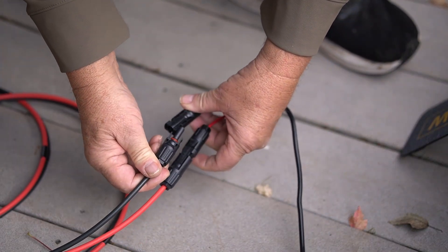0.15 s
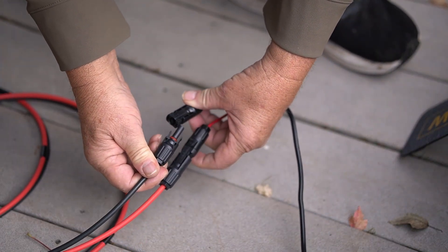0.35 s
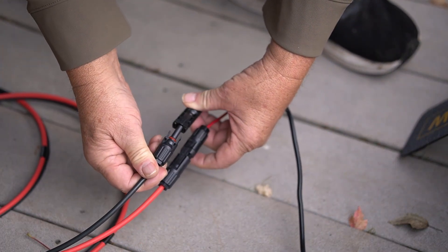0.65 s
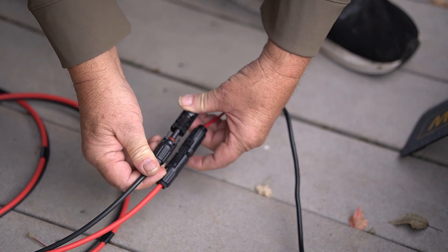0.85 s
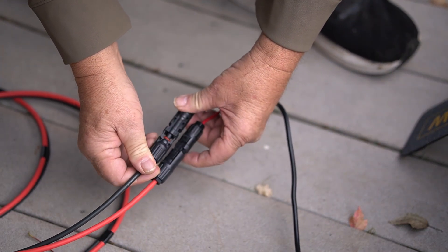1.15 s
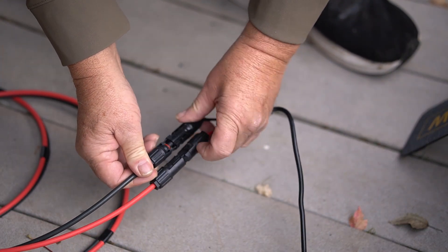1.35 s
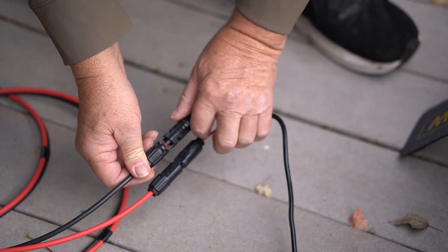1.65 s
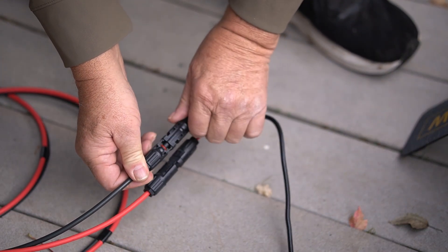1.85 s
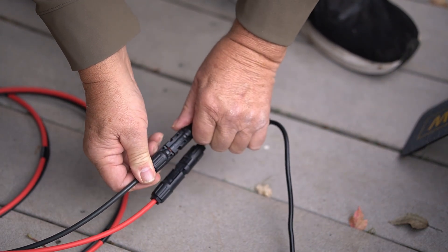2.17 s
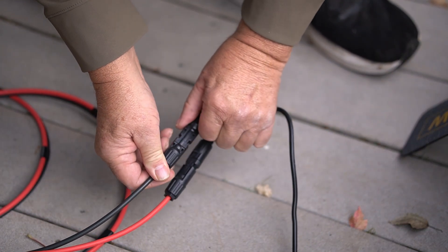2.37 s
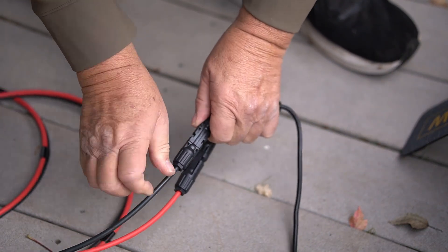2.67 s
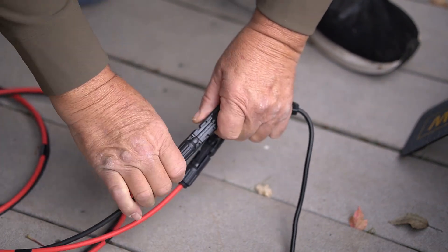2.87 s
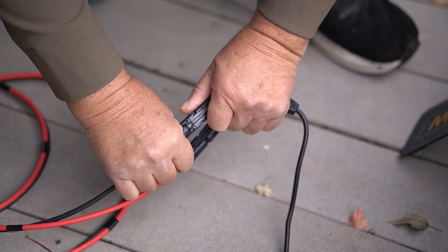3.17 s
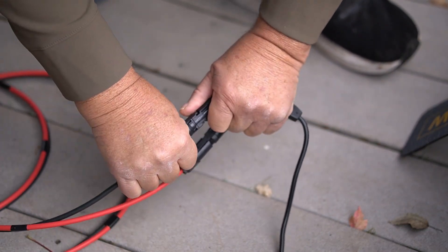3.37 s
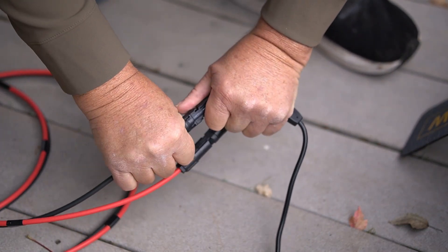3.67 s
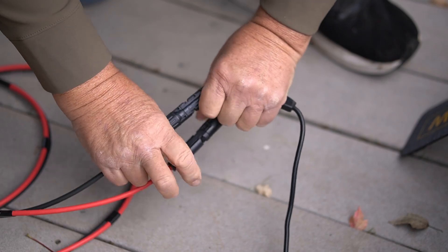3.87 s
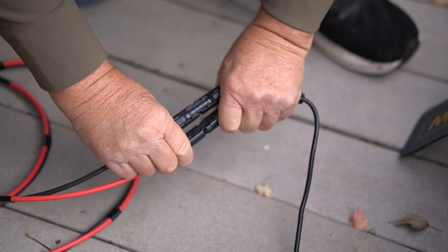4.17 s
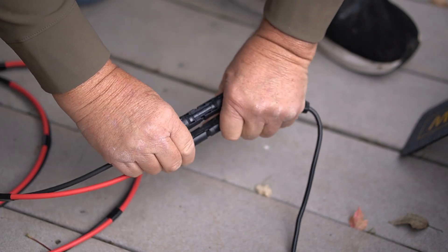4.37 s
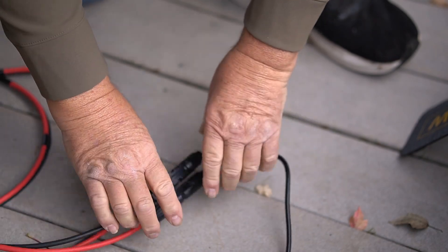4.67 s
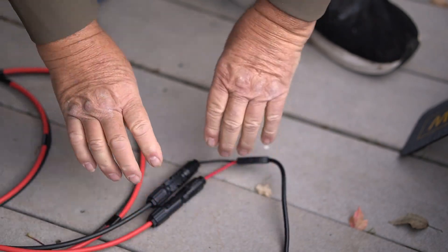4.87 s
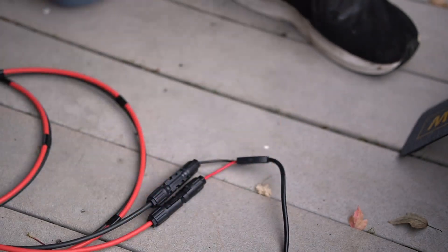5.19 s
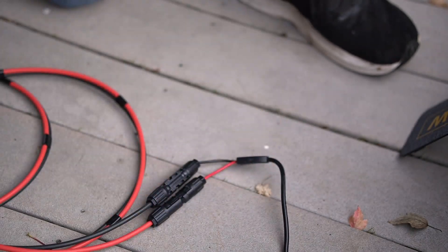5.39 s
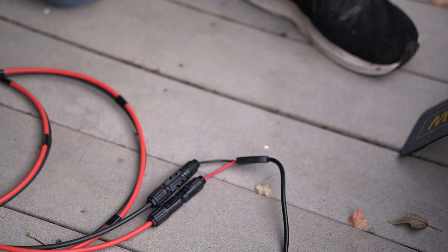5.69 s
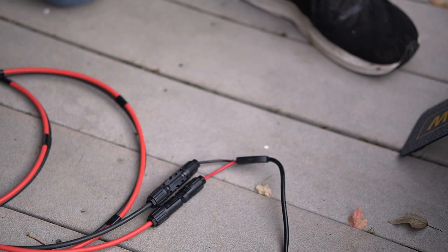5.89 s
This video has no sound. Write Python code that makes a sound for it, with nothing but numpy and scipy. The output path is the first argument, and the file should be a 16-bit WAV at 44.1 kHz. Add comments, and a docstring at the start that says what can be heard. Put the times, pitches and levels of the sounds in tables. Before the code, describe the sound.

A low unsteady rumble and soft steady hiss lie beneath small plastic clicks, first isolated, then clustered, with dry finger scratches and dull handling bumps. Close to the microphone, the joined pieces knock and land on deck boards, a woody clack with plastic rattle. Afterward comes a broad jacket rustle, a soft sole drag, muted footfall thuds and a couple of last ticks.

```python
"""Over a wavering low outdoor rumble, a faint hiss and rubbing sleeves, someone crouching on a board deck plugs
two plastic cable connectors together: struck shell modes tick, latches snap, and bursts of grains scratch.
The pair then touches the boards and drops on them with a short clatter, as decaying board and casing modes.
Last, the person rises and shifts a foot: shaped noise swishes the jacket and drags the sole, low modes thud
through the deck, and a few more plastic ticks sound."""
import sys
import numpy as np
from scipy import signal
from scipy.fft import rfft, irfft
from scipy.io import wavfile
from scipy.ndimage import map_coordinates

SR = 44100
rng = np.random.default_rng(int(sys.argv[2]) if len(sys.argv) > 2 else 0)


def log_audio(samples):
    """Write samples as a 16-bit WAV file to the path given in sys.argv[1]."""
    # one column per channel
    frames = np.atleast_2d(samples).T
    # limit to full scale, then quantise
    limited = np.clip(frames, -1, 1)
    pcm = np.round(limited * 32767).astype(np.int16)
    wavfile.write(sys.argv[1], SR, pcm)


N = 266364  # length in samples

# Spectrum of the outdoor rumble: freq_hz, level_db
RUMBLE_SPECTRUM = [(12, -13), (20, 1), (43, -1.5), (123, -8), (156, -5.5), (189, -14.5), (248, -14.5),
                   (344, -20.5), (394, -19.5), (536, -30), (615, -33), (659, -31), (730, -30),
                   (1200, -36.5), (1560, -41.5), (2640, -120)]
# Spectrum of the steady hiss: freq_hz, level_db
HISS_SPECTRUM = [(500, -54), (1500, -1), (1900, 1.5), (2230, -0.5), (2700, 0), (3800, 2), (4800, -1),
                 (5800, 0), (7800, -7), (9300, -8.5), (13000, -16.5), (16000, -17)]

# Arm movements, small at the connectors, then wide as the person rises:
# fastest_s, level_db, speeding_up_s, slowing_down_s, crisp_rubbing_db (relative to level_db)
ARM_MOVES = [(.85, -70, 0.67, 1, -2), (1.57, -57.5, 0.16, 0.21, -19), (1.855, -58.5, 0.05, 0.062, -11),
             (2.15, -65, 0.5, 0.33, -10), (2.51, -60, 0.063, 0.015, -5), (2.68, -58.5, 0.3, 0.21, -7),
             (3.15, -66.5, 0.36, 0.41, -8), (3.5, -62.5, 0.041, 0.06, -5), (3.96, -58.5, 0.31, 0.36, -6.5),
             (4.3, -63, 0.061, 0.2, -7), (4.62, -60, 0.28, 0.55, -12), (5.12, -47, 0.16, 0.19, -14),
             (5.37, -48, 0.28, 0.3, -18), (5.74, -51, 0.21, 0.19, -15), (5.96, -62, 0.17, 0.16, -6)]
# Spectra of the sleeve cloth, its crisp rubbing and the loose jacket folds: freq_hz, level_db
SLEEVE_SPECTRUM = [(500, -3), (1400, -8.5), (1850, -7.5), (2220, -3), (2650, -5), (4200, -1), (5200, -2.5),
                   (5900, 0), (7000, -7), (8300, -12), (11000, -20), (16000, -37)]
CRISP_SPECTRUM = [(4000, -7), (7000, 5), (8800, 3), (9800, 2.5), (11000, 0), (13000, -2), (14500, -5),
                  (16000, -16)]
FOLDS_SPECTRUM = [(300, 2), (650, -24), (1100, -4), (1900, -1.5), (2700, -0.5), (3500, -2), (5000, -14),
                  (9000, -37)]

# Single folds scuff past each other: peak_s, level_db, pitch_hz, half_width_s
FOLD_SCUFFS = [(4.995, -55.5, 3500, 0.027), (5.095, -52.5, 6550, 0.065), (5.142, -48.5, 1850, 0.035),
               (5.195, -51, 2750, 0.032), (5.245, -49.5, 4830, 0.039), (5.39, -51.5, 2570, 0.053),
               (5.492, -51.5, 3120, .022)]
# The jacket pulls taut: fastest_s, level_db, speeding_up_s, slowing_down_s
TAUT_SWISHES = [(5.42, -52.5, 0.19, 0.17), (5.73, -55.5, 0.14, 0.094)]
# Spectrum of taut fabric: freq_hz, level_db
TAUT_SPECTRUM = [(1500, -27), (2200, -8), (2700, -22), (3900, -4), (4800, -19), (5900, 1.5), (7000, -9),
                 (9000, -22), (10200, -12), (11000, -7.5), (11800, -11), (12400, -12.5), (13500, -18),
                 (14400, -15), (16000, -26)]
# Resonance of one fold: multiple_of_pitch, level_db
FOLD_RESONANCE = [(.3, -32), (.65, -12), (.85, -3), (1, -3), (1.18, -2.5), (1.5, -15), (3, -47)]

# Spectrum of a shoe dragging over boards: freq_hz, level_db
SOLE_SPECTRUM = [(150, -10), (290, 6), (420, 0), (600, 2.5), (950, -9), (1400, -23), (5000, -35)]
# Weight shifts thud through the deck: start_s, level_db, pitch_hz, t60_s
WEIGHT_SHIFTS = [(5.477, -36, 44.3, 0.19), (5.545, -36, 86, 0.21), (5.591, -27.5, 40.5, 0.16),
                 (5.75, -31, 71.4, 0.036), (5.765, -30.5, 38, 0.17)]

# Fingers slip on the ribbed shells: peak_s, level_db, pitch_hz, half_width_s
FINGER_SLIPS = [(1.425, -59.5, 4250, 0.014), (1.6, -63, 5770, 0.051), (1.98, -60.5, 5630, 0.022),
                (2.096, -61, 6100, 0.023), (2.333, -59.5, 5100, 0.007), (2.453, -59, 4800, 0.0076),
                (2.478, -59, 5000, 0.014), (2.631, -58, 5700, .008), (2.64, -74, 12500, .08),
                (2.735, -69, 9500, .02), (2.718, -52, 4900, 0.0067), (2.745, -53, 5100, 0.024),
                (2.825, -62.5, 5030, 0.03), (2.916, -59, 5270, 0.028), (3.128, -61, 5360, 0.023),
                (3.237, -59, 5700, .006), (3.264, -58.5, 5200, 0.015), (3.657, -60.5, 5900, .007),
                (3.709, -57, 6170, 0.006), (3.749, -54, 6260, 0.0062), (3.838, -59, 2100, 0.011),
                (3.94, -57, 4900, 0.27), (3.98, -64, 11000, 0.036), (4.05, -51.5, 5600, 0.01),
                (4.24, -57, 6000, 0.012), (4.266, -55.5, 6000, 0.0063)]
# Resonance of a shell under a finger: multiple_of_pitch, level_db
FINGER_RESONANCE = [(.3, -28), (.65, -13.5), (.85, -2.5), (1, -1), (1.18, -3.5), (1.45, -13.5),
                    (2.2, -19), (3, -45)]

# Dull bumps of hands and cable: start_s, level_db, plastic_rattle_db
HAND_BUMPS = [(2.2376, -45, 5), (2.5547, -33.5, -9), (2.761, -39.5, -3), (2.8570, -40, -20),
              (3.8030, -43.5, -9), (4.081, -38.5, 0.5), (4.749, -28, -3.5)]
# Spectrum of their plastic rattle: freq_hz, level_db
RATTLE_SPECTRUM = [(300, -3), (700, -1), (1400, 2.5), (2500, -18), (5000, -15), (12000, -33)]

# Modes of the pair while the fingers still hold it: freq_hz, level_db, t60_s
HELD_MODES = [(278, -32, .08), (392, -26, 0.055), (760, -42, 0.034), (1560, -42, .03), (2020, -40.5, .03),
              (2600, -46, .02), (3800, -38, .022), (4400, -37, 0.013), (4900, -45, .012)]
# The connectors land and chatter: start_s, board_blow_db, casing_blow_db, contact_ms
LANDING_BLOWS = [(4.7823, 4.3, -3.8, 0.09), (4.78315, -23.4, 8.5, 0.1), (4.78597, -10, 1.5, 0.43),
                 (4.7894, -18, -7.9, 0.13), (4.79245, -25.0, -10.2, 0.13)]
# Low modes of the deck board: freq_hz, level_db, t60_s
BOARD_MODES = [(97, -32.8, 0.23), (125.7, -25.5, 0.26), (149, -20.5, 0.1), (226.7, -34, 0.19),
               (276, -27, 0.15), (418, -15, 0.022), (486, -38, 0.095)]
# Modes of the joined casings, loose on the board: freq_hz, level_db, t60_s
CASING_MODES = [(586.5, -39, 0.17), (730, -27, 0.042), (845, -28.5, 0.06), (937, -46, 0.13),
                (1161, -30.5, 0.059), (1215, -37, 0.043), (1595, -38, 0.068), (1700, -30.5, 0.058),
                (2121, -36.5, 0.068), (2316, -32.5, 0.043), (2460, -37.5, 0.046), (2750, -35.5, 0.034),
                (3030, -35.2, 0.028), (3397, -29.5, 0.053), (3550, -12.4, 0.0066), (3780, -29.5, 0.055),
                (3900, -24, 0.019), (4013, -26.5, 0.036), (4190, -28.9, 0.034), (4540, -30.2, 0.013),
                (5000, -30, 0.0087), (5540, -27, 0.011), (5910, -31.5, 0.029), (6229, -36, 0.01)]
# Spectra of the crack of plastic on wood and the wash from nearby walls: freq_hz, level_db
CRACK_SPECTRUM = [(150, -3), (560, -10), (1100, -1), (1600, -4), (3000, 0), (4500, -0.5), (6200, -2.5),
                  (7500, -8), (9300, -6.5), (12000, -23.5), (16000, -27)]
WASH_SPECTRUM = [(100, 6.5), (400, 6), (700, -2.5), (1400, 0), (2500, -4), (4300, -2), (6500, -16),
                 (10000, -26), (16000, -42)]

# Plastic ticks and latch snaps:
# start_s, level_db, strongest_ring_hz, t60_s (at that pitch), sharp_edge_db, scrape_before_snap_s
PLASTIC_CLICKS = [(0.1515, -47, 2900, 0.014, -6, .0006), (0.505, -42.5, 9050, 0.011, -1, 0.0031),
                  (0.7258, -48, 3580, 0.01, -19, .0003), (1.061, -49.5, 3000, 0.0076, -17, .0002),
                  (1.0912, -49, 3220, 0.014, -6, .0008), (1.103, -47, 5800, 0.016, -7, 0.005),
                  (1.1072, -41.5, 2660, 0.009, -33, .0012), (1.1095, -49, 2880, .028, -18, .001),
                  (1.111, -47, 3000, .014, -22, .0008), (1.143, -50.5, 4200, .024, -22, .002),
                  (1.576, -53, 3300, .012, -14, .001), (1.84, -53, 5500, .02, -5, .001),
                  (2.2018, -50.5, 6000, 0.018, 6, 0.007), (2.48, -50, 5200, 0.013, 1, .001),
                  (3.048, -51.5, 4660, 0.065, -25, .0002), (3.3613, -42.5, 3330, 0.017, -11, 0.00011),
                  (3.4183, -45.5, 4870, 0.01, -2, .0003), (3.581, -56.5, 3020, 0.023, -7, .001),
                  (4.041, -43.5, 6560, 0.037, 0, 0.0004), (4.1653, -50, 3320, 0.033, -4, .003),
                  (4.3103, -42, 6600, 0.031, -16, .0003), (4.55, -55, 3540, .012, -4, .0005),
                  (5.362, -42, 4150, .022, -5, .002), (5.802, -45, 3000, 0.018, -22, 0.0011)]
# Modes of the hollow shell: freq_hz, level_db
SHELL_MODES = [(1300, -15.5), (1900, -5), (2480, -13), (2780, -3.5), (3320, -0.5), (3950, 2.5), (4330, 2),
               (5220, 3), (5850, 5), (7050, 7.5), (8400, 3.5), (9000, 1), (10200, 2.5), (11200, -3),
               (12400, -13), (15300, -16)]
# Spectrum of a scraping plastic edge: freq_hz, level_db
EDGE_SPECTRUM = [(500, -26), (1300, -10), (2800, 6.5), (6000, 3), (9000, 2.5), (12000, -7), (16000, -22)]

SWELL_SHAPE = 1.6  # 1 = pointed, 2 = bell-shaped
SMOOTH_DB = -54  # far above this level so many threads slide at once that the grain evens out
TOP_HZ = 15850


def undb(db):
    """Logarithmic levels: decibels become amplitude gain."""
    return 10 ** (np.asarray(db) / 20)


def noise(colour, x=None):
    """Spectral filtering: noise, or the given excitation, takes a colour and is brought to rms 1."""
    x = rng.standard_normal(N) if x is None else x
    hz, db = np.transpose(colour)
    freqs = np.maximum(np.fft.rfftfreq(len(x), 1 / SR), 1)
    gain = undb(np.interp(np.log(freqs), np.log(hz), db))
    y = irfft(rfft(x) * gain, len(x))
    return y / y.std()


def burst(colour, t):
    """Broadband excitation: fresh coloured noise as long as the time axis t."""
    return noise(colour, rng.standard_normal(len(t)))


def fade(t, t60):
    """Linear damping: an exponential decay reaches -60 dB after t60."""
    return np.exp(-np.log(1000) * t / t60)


def ring(t, hz, t60):
    """Free vibration: one struck mode is a decaying sine."""
    return np.sin(2 * np.pi * hz * t) * fade(t, t60)


def walk(rate):
    """Random fluctuation: straight lines join independent normal values, rate of them per second."""
    knots = np.arange(N) / SR * rate
    return np.interp(knots, np.arange(N), rng.standard_normal(N))


def seconds(size):
    """Sampling: the time axis of a short sound."""
    return np.arange(size) / SR


def add(out, start, x):
    """Superposition: x is mixed into out from the given time."""
    i = int(start * SR)
    out[i:i + len(x)] += x[:N - i]


def swell(peak, rise, fall):
    """Speed of one movement: it builds up to 1 and dies away, being 1/e at rise and fall from the peak."""
    dt = np.arange(N) / SR - peak
    return np.exp(-np.abs(dt / np.where(dt < 0, rise, fall)) ** SWELL_SHAPE)


def rub(colour, grain_db, flutter_db, patchy_db=1.8):
    """Stick-slip friction: dense tiny grains of uneven size, whose bands flicker independently, at rms 1."""
    grains = rng.standard_normal(N) * undb(grain_db * walk(2500) + flutter_db * walk(70))
    edges_hz = [100, 1500, 2400, 3600, 5200, 7500, 11000, 17000]
    patchy = np.zeros(N)
    for band_hz in zip(edges_hz, edges_hz[1:]):
        bandpass = signal.butter(4, band_hz, "bandpass", fs=SR, output="sos")
        patchy += signal.sosfiltfilt(bandpass, grains) * undb(patchy_db * walk(35))
    return noise(colour, patchy)


def scratches(rows, colour, grain_db, flutter_db, glide):
    """Resonant friction: grains excite a resonance that swells, fades and glides by octaves per second."""
    out, t = np.zeros(N), seconds(size=16384)
    dt = t - t[-1] / 2
    grains = rng.standard_normal(N) * undb(grain_db * walk(2800) + flutter_db * walk(200))
    for peak, db, hz, half_width in rows:
        i = int((peak + dt[0]) * SR)
        resonance = [(hz * ratio, d) for ratio, d in colour]
        slip = noise(resonance, grains[i:i + len(t)])
        # reading the grains ever faster raises their pitch
        slip = map_coordinates(slip, [np.cumsum(2 ** (glide * dt))], mode="mirror")
        add(out, peak + dt[0], undb(db) * slip * np.exp(-(dt / half_width) ** 2))
    return out


def outdoors(rumble_db=-47.5, hiss_db=-69, waver_db=-1.7):
    """Stationary and modulated noise: a low rumble wavers in level over a steady hiss."""
    rumble = noise(RUMBLE_SPECTRUM) * undb(rumble_db + waver_db * walk(3.66))
    return rumble + undb(hiss_db) * noise(HISS_SPECTRUM)


def cloth(colour, even):
    """Summation of many slips: grain gives way to smooth noise as the power share even nears 1."""
    grainy = rub(colour, grain_db=4, flutter_db=2.0)
    return np.sqrt(1 - even) * grainy + np.sqrt(even) * noise(colour)


def sleeves(folds_db=-49.5):
    """Speed-dependent friction: arm movements swish the cloth, and loose folds slide once as the arms lift."""
    body_power = crisp_power = 0
    for peak, db, rise, fall, crisp_db in ARM_MOVES:
        power = (undb(db) * swell(peak, rise, fall)) ** 2
        body_power = body_power + power
        crisp_power = crisp_power + power * undb(crisp_db) ** 2
    even = 1 / (1 + undb(SMOOTH_DB) ** 2 / (body_power + 1e-18))
    body = np.sqrt(body_power) * cloth(SLEEVE_SPECTRUM, even)
    crisp = np.sqrt(crisp_power) * cloth(CRISP_SPECTRUM, even)
    slide = undb(folds_db) * swell(peak=5.14, rise=0.095, fall=0.35)
    return body + crisp + slide * rub(FOLDS_SPECTRUM, grain_db=1.0, flutter_db=0.5)


def jacket():
    """Friction and tension: single folds scuff with rising pitch, and taut fabric swishes brightly."""
    scuffs = scratches(FOLD_SCUFFS, FOLD_RESONANCE, grain_db=2.0, flutter_db=0.5, glide=2.5)
    pull = sum(undb(db) * swell(peak, rise, fall) for peak, db, rise, fall in TAUT_SWISHES)
    return scuffs + pull * rub(TAUT_SPECTRUM, grain_db=1.0, flutter_db=1.8)


def shoe(level_db=-60):
    """Sliding friction: the sole drags softly as the foot shifts."""
    drag = undb(level_db) * swell(peak=5.63, rise=0.13, fall=0.33)
    return drag * rub(SOLE_SPECTRUM, grain_db=0.0, flutter_db=1.0)


def steps(overtone=2.12, overtone_db=-5):
    """Damped deflection: the deck sags under a shoe and swings back, with one overtone."""
    out, t = np.zeros(N), seconds(size=16384)
    for start, db, hz, t60 in WEIGHT_SHIFTS:
        thud = ring(t, hz, t60) + undb(overtone_db) * ring(t, hz * overtone, t60)
        add(out, start, -undb(db) * thud)  # negative: the deck sags first
    return out


def fingers():
    """Stick-slip on a shell: skin makes a grainy scratch around the shell's resonance."""
    return scratches(FINGER_SLIPS, FINGER_RESONANCE, grain_db=1.5, flutter_db=2.5, glide=.3)


def crackle(from_s=1.2, to_s=4.5, per_s=22, level_db=-62, spread_db=3, hz=5800, t60=0.004):
    """Random impulses: cables and shells give tiny ticks of changing pitch while the hands work them."""
    out, t = np.zeros(N), seconds(size=1024)
    span_s = to_s - from_s
    for when, size, pitch in rng.random((int(per_s * span_s), 3)):
        centre = hz * 2 ** (1.5 * (pitch - .5))
        tick = burst([(centre / 4, -25), (centre, 0), (centre * 2, -28)], t) * fade(t, t60)
        extra_db = spread_db * min(-np.log(1 - size), 3)  # most ticks are faint, a few stand out
        add(out, from_s + when * span_s, undb(level_db + extra_db) * tick)
    return out


def bumps(rattle_db=-11, rattle_t60=0.053):
    """Damped impact: soft knocks, deadened by the fingers, ring two low modes and a plastic rattle."""
    out, t = np.zeros(N), seconds(size=8192)
    body = 0.6 * ring(t, 346, 0.074) + 0.44 * ring(t, 388, 0.097)
    for start, db, loose_db in HAND_BUMPS:
        rattle = burst(RATTLE_SPECTRUM, t) * fade(t, rattle_t60)
        add(out, start, undb(db) * (body + undb(loose_db + rattle_db) * rattle))
    return out


def modes(table, t):
    """Modal superposition: struck modes add up with alternating sign."""
    return sum((-1) ** k * undb(db) * ring(t, hz, t60) for k, (hz, db, t60) in enumerate(table))


def touch(at_s=4.7488, grit_db=-47, grit_t60=0.04):
    """Damped modes: one end knocks on the board just before the drop, still held by the fingers."""
    out, t = np.zeros(N), seconds(size=8192)
    grit = undb(grit_db) * burst(WASH_SPECTRUM, t) * fade(t, grit_t60)
    add(out, at_s, modes(HELD_MODES, t) + grit)
    return out


def landing(casing_rise_s=0.00021, crack_db=-22.0, crack_t60=0.013,
            wash_db=-34.5, wash_t60=0.22, wash_rise_s=0.0042):
    """Impact and contact time: board and casings ring after each blow, and a longer contact is duller."""
    out, t = np.zeros(N), seconds(size=16384)
    board = modes(BOARD_MODES, t)
    casing = sum(undb(db) * ring(t, hz, t60) for hz, db, t60 in CASING_MODES)
    casing = casing * (1 - np.exp(-t / casing_rise_s))
    for start, board_db, casing_db, contact_ms in LANDING_BLOWS:
        crack = undb(crack_db) * burst(CRACK_SPECTRUM, t) * fade(t, crack_t60)
        wash = undb(wash_db) * burst(WASH_SPECTRUM, t) * fade(t, wash_t60)
        wash *= 1 - np.exp(-t / wash_rise_s)
        blow = undb(board_db) * board + undb(casing_db) * (casing + crack + wash)
        push = np.exp(-np.pi * t / (contact_ms / 1000))
        add(out, start, signal.fftconvolve(blow, push / push.sum()))
    return out


def struck_shell(t, strongest_hz, t60, sharp_db, focus_oct=0.27, radiates_hz=1800):
    """Modal excitation: the contact point favours some shell modes, and a sharp edge wakes them all."""
    shell = np.zeros(len(t))
    for hz, db in SHELL_MODES:
        favour = np.exp(-(np.log2(hz / strongest_hz) / focus_oct) ** 2) + undb(sharp_db)
        detuned_hz = hz * (1 + 0.0099 * rng.standard_normal())
        shell += undb(db) * favour * ring(t, detuned_hz, t60 * np.sqrt(strongest_hz / hz))
    # so small a shell radiates no bass
    shell = signal.sosfilt(signal.butter(3, radiates_hz, "highpass", fs=SR, output="sos"), shell)
    return shell / np.sqrt(np.sum(shell ** 2) / (.002 * SR))  # the energy of 2 ms at rms 1


def clicks(edge_t60=0.015, edge_db=-5.0, scrape_db=-5, wash_db=-28, wash_t60=0.58):
    """Stored strain released: a plastic edge scrapes, slips off and rings the shell."""
    out, t = np.zeros(N), seconds(size=4096)
    for start, db, hz, t60, sharp_db, scrape_s in PLASTIC_CLICKS:
        shell = struck_shell(t, hz, t60, sharp_db)
        grit = burst(EDGE_SPECTRUM, t)
        edge = undb(edge_db + sharp_db / 5) * fade(t, edge_t60)
        wash = undb(wash_db) * fade(t, wash_t60)
        add(out, start, undb(db) * (shell + grit * (edge + wash)))
        scrape = grit * np.exp(-t[::-1] / scrape_s)  # grows until the edge slips off
        add(out, start - len(t) / SR, undb(db + scrape_db + sharp_db / 2) * scrape)
    return out


def bounce(x, lag_s=0.00177, mirror_db=-16):
    """Image source: the boards mirror what happens above them, a little late, rippling its spectrum."""
    mirrored = np.interp(np.arange(N) - lag_s * SR, np.arange(N), x)
    return (x + undb(mirror_db) * mirrored) / np.hypot(1, undb(mirror_db))


def scene():
    """Superposition: all sources add up in one channel, those in the hands with their reflection."""
    on_deck = shoe() + steps() + bumps() + touch() + landing()
    in_hands = bounce(fingers() + crackle() + clicks())
    return (outdoors() + sleeves() + jacket() + on_deck + in_hands)[None]


def record(dry):
    """Band limiting: a steep elliptic low-pass cuts the top of the spectrum."""
    return signal.sosfilt(signal.ellip(10, .2, 80, TOP_HZ, fs=SR, output="sos"), dry)


dry = scene()
out = record(dry)
log_audio(out)
```